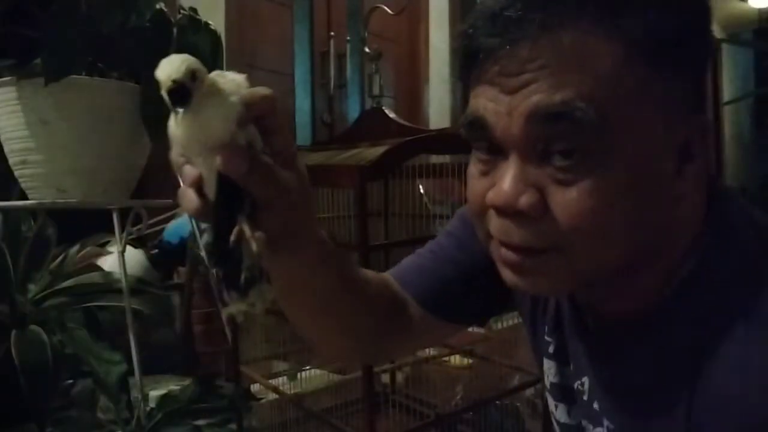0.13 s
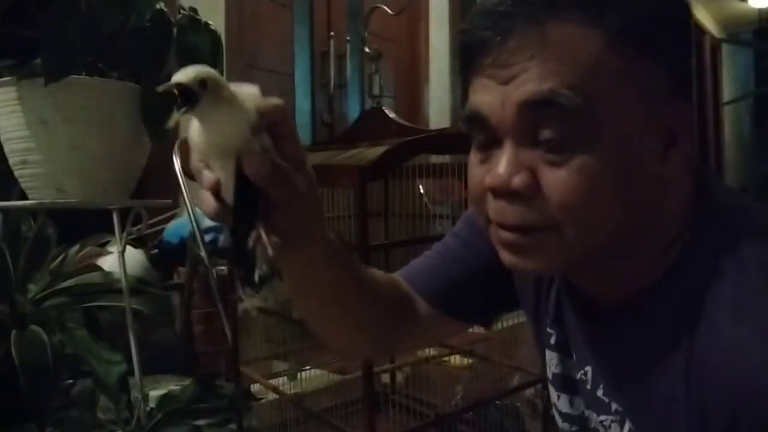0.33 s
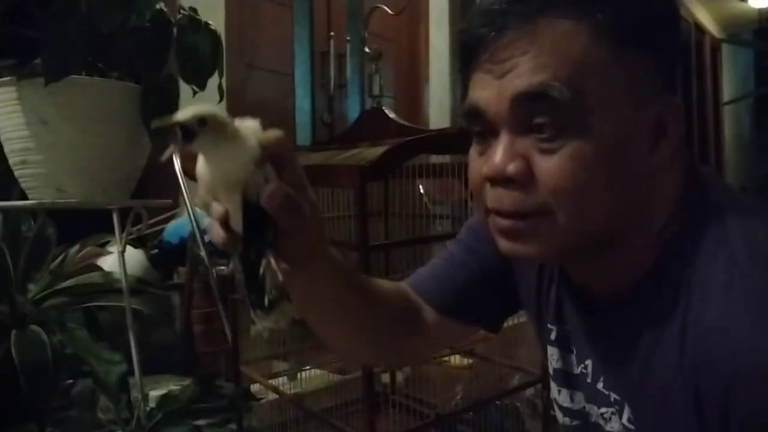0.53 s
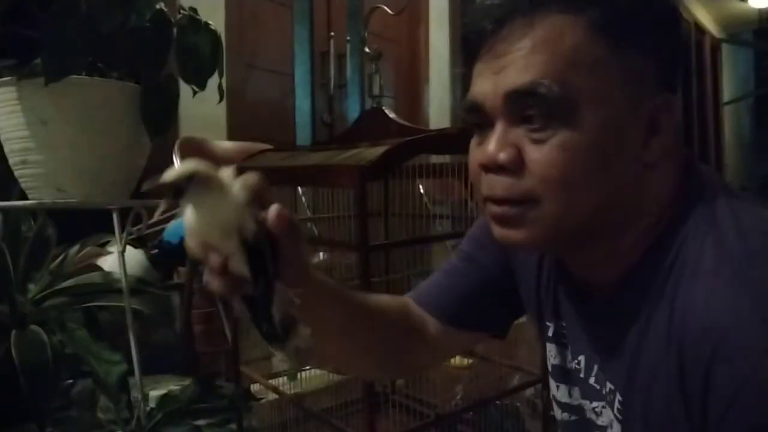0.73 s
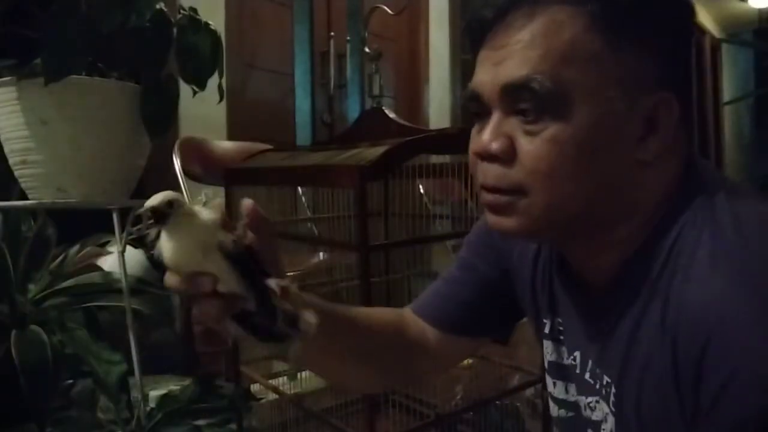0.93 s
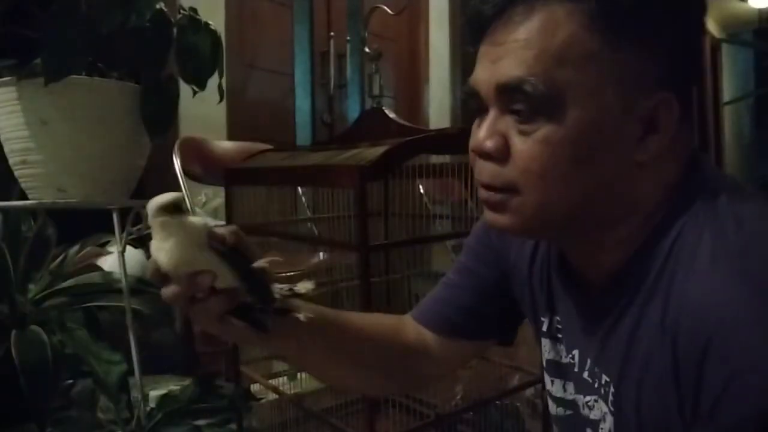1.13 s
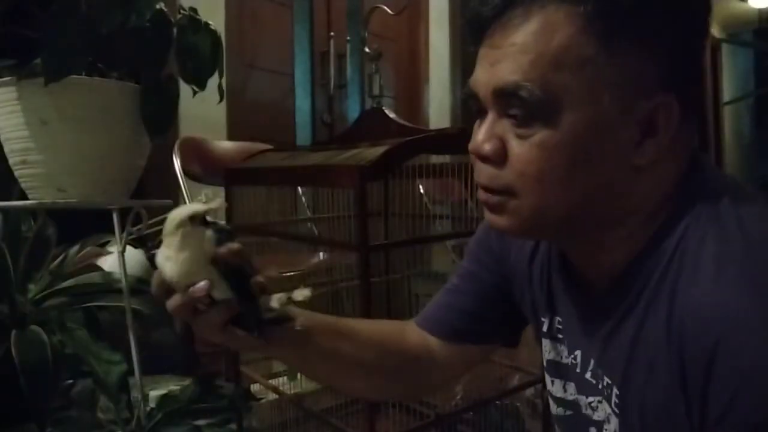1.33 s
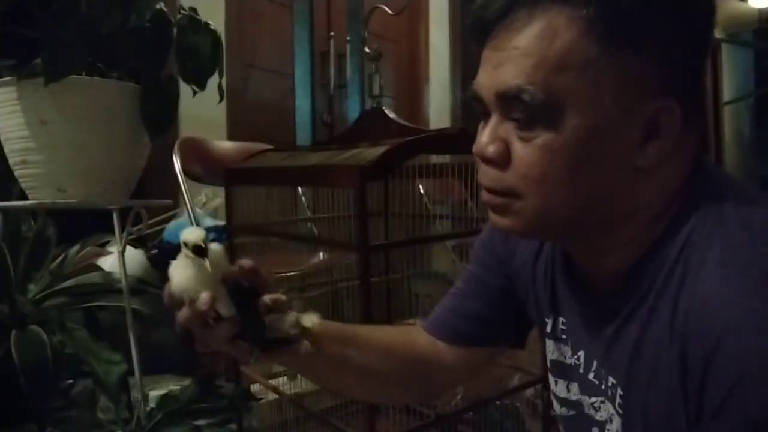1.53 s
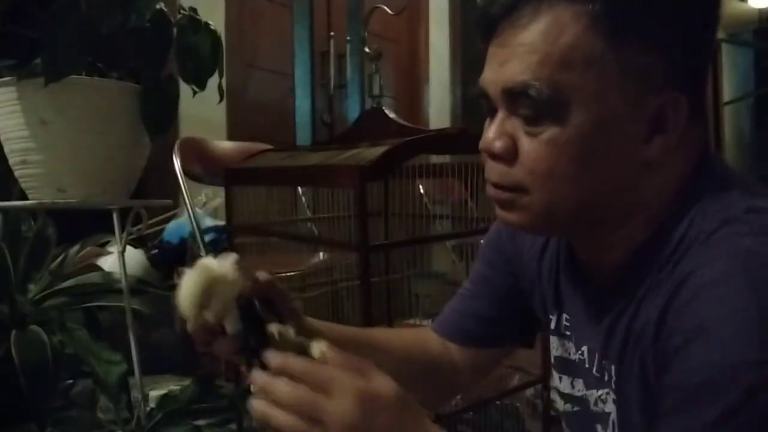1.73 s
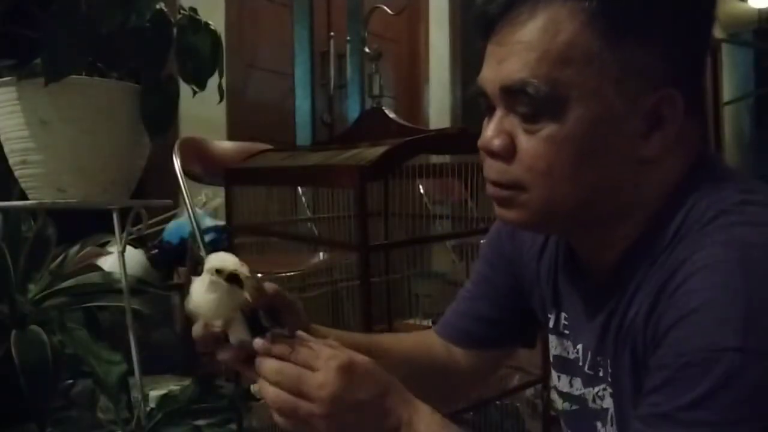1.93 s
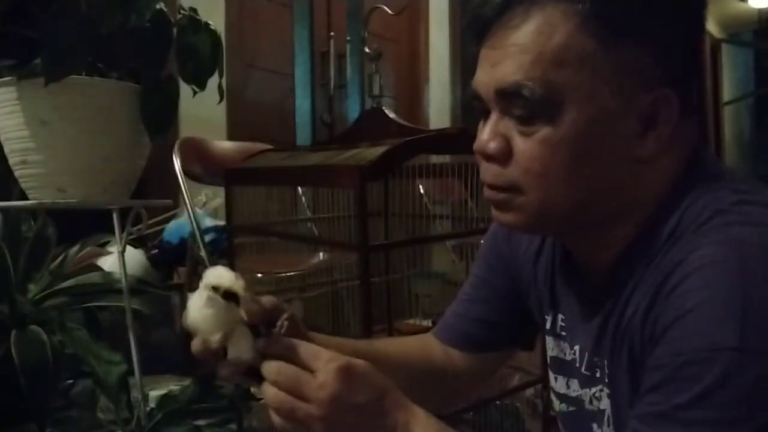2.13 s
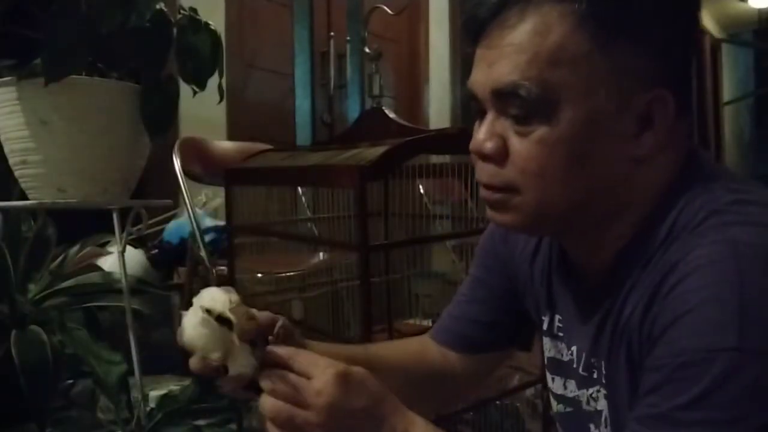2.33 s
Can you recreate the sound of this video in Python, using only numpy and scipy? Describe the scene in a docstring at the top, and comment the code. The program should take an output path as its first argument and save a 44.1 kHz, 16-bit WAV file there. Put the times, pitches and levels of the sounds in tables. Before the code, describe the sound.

A myna held in the hand squawks twice close to the microphone, shrill and raspy, then just starts a third call. Low rumble, hiss and soft handling noise lie underneath in a small hard room.

```python
"""Low rumble, hiss and a soft handling noise in a small hard room; then a myna, held in the hand
close to the microphone, squawks twice and starts a third call.
Each squawk is a shrill tone with strong overtones; the syrinx breaks into a chaotic rasp and,
in stretches of the first two calls, a slower second vibration."""
import sys
import numpy as np
from scipy import signal
from scipy.fft import rfft, irfft, next_fast_len
from scipy.io import wavfile
from scipy.ndimage import uniform_filter1d, minimum_filter1d, map_coordinates

SR = 44100
rng = np.random.default_rng(int(sys.argv[2]) if len(sys.argv) > 2 else 0)


def to_wav(s):
    """Save 16-bit WAV."""
    ch = np.atleast_2d(s).T  # columns
    pcm = np.round(np.clip(ch, -1, 1) * 32767)  # PCM
    wavfile.write(sys.argv[1], SR, pcm.astype(np.int16))


N = 104605


def amp(db):
    """Decibels to gain."""
    return 10 ** (np.asarray(db) / 20)


def unit(x):
    """Scale to rms 1."""
    return x / np.sqrt(np.mean(x ** 2) + 1e-20)


def along(points, hz):
    """(Hz, value) points on a log axis."""
    f, v = np.transpose(points)
    return np.interp(np.log(hz + 1), np.log(f + 1), v)


def clock():
    """The time of each sample."""
    return np.arange(N) / SR


def curves(rows):
    """One value per sample for each column after the time."""
    s, *cols = np.transpose(rows)
    return [np.interp(clock(), s, c) for c in cols]


def wobble(rate):
    """A smooth random curve, rate knots a second."""
    return map_coordinates(rng.standard_normal(int(N * rate / SR) + 4), [clock() * rate])


def gate(start, end, rise, fall):
    """Open from start to end, with ramps outside."""
    return np.interp(clock(), [start - rise, start, end, end + fall], [0, 1, 1, 0])


def filtered(x, response):
    """x times a complex response of frequency."""
    m = next_fast_len(N + SR // 2)
    return irfft(rfft(x, m) * response(np.fft.rfftfreq(m, 1 / SR)), m)[..., :N]


# Room tone at the microphone (frequency [Hz], relative density [dB])
ROOM_TONE = [(18, -20.5), (40, -15), (75, -11.5), (140, -15), (195, -14), (290, -15.5), (420, -19),
             (750, -20), (1500, -27.5), (3000, -34), (6000, -40.5), (9500, -35), (11500, -40), (12800, -52),
             (15500, -56.5)]
# How alike it is left and right (frequency [Hz], correlation [0-1])
ROOM_TONE_LIKENESS = [(60, 0.92), (250, 0.968), (600, 0.19), (1500, 0.033), (12000, 0.04)]
# Hum, dead centre (frequency [Hz], level [dB])
HUM_LINES = [(25.5, -41.5), (73, -60), (191, -56), (277, -56.5), (300, -57), (768, -61.5), (1530, -64.5)]


def room_tone():
    """Steady centred rumble and wide hiss, with a deep, slightly wavering hum."""
    def mid_and_side(hz):
        width = np.arccos(np.clip(along(ROOM_TONE_LIKENESS, hz), -1, 1)) / 2
        return amp(along(ROOM_TONE, hz)) * [np.cos(width), np.sin(width)]

    mid, side = filtered(rng.standard_normal((2, N)), mid_and_side)
    out = amp(-42.5) * unit(np.array([mid + side, mid - side]))
    for hz, db in HUM_LINES:
        waver = 0.029 * np.sqrt(hz) * wobble(6.43)
        out += amp(db) * np.sqrt(2) * np.sin(2 * np.pi * hz * clock() + waver)
    return out


# The hand, close to the microphone (time [s], level [dB], centre [Hz], width [Hz], t60 [s])
HAND_BUMPS = [(0.126, -43.5, 1580, 1800, 0.25), (2.091, -33.5, 1315, 169, 0.1),
              (2.109, -35.5, 695, 300, 0.076)]


def handling(rise_s=0.0014):
    """Short dull brushes and bumps as the bird is shifted in the hand."""
    out = np.zeros((2, N))
    for start, db, centre, width, t60 in HAND_BUMPS:
        age = np.maximum(clock() - start, 0)
        band = filtered(rng.standard_normal(N), lambda hz: 1 / (1 + (2 * (hz - centre) / width) ** 2))
        out += unit(band) * amp(db - 60 * age / t60) * (1 - np.exp(-age / rise_s))
    return out


# Decay of the small hard room (frequency [Hz], t60 [s])
ROOM_DECAY = [(300, 0.23), (3500, 0.46), (7000, 0.4), (11000, 0.32), (15000, 0.32)]


def room_echo(near, tail_rise_s=0.0055, early_decay_s=0.0081):
    """Early reflections from surfaces near the microphone, then a diffuse tail."""
    hz, times, spectra = signal.stft(rng.standard_normal((2, SR * 3 // 4)), SR, nperseg=256)
    decay = amp(-60 * times / along(ROOM_DECAY, hz)[:, None])
    tail = signal.istft(spectra * decay, SR, nperseg=256)[1]
    age = np.arange(tail.shape[1]) / SR
    tail *= 1 - np.exp(-age / tail_rise_s)
    spikes = rng.standard_normal(tail.shape) ** 5
    early = spikes * (age > 0.002) * np.exp(-age / early_decay_s)
    response = sum(amp(db) * part / np.linalg.norm(part, axis=1, keepdims=True)
                   for part, db in [(tail, -14.5), (early, -6.5)])
    return signal.fftconvolve(near, response, axes=1)[:, :N]


# Pitch of each call (time [s], pitch [Hz])
FIRST_PITCH = [(1.06, 3204), (1.09, 3318), (1.135, 3876), (1.18, 3990), (1.197, 3940), (1.203, 3670.0),
               (1.249, 3779), (1.285, 3686), (1.3, 3840.0), (1.312, 3510), (1.381, 3600), (1.395, 3397),
               (1.414, 3256), (1.46, 3315.0), (1.501, 3040), (1.524, 3369)]
SECOND_PITCH = [(1.706, 3241), (1.722, 3375.0), (1.784, 3200), (1.804, 3480), (1.861, 3686), (1.894, 3610),
                (1.902, 3506), (1.934, 3570), (1.948, 3718), (1.958, 3610), (1.968, 3454), (1.983, 3421),
                (1.994, 3566), (2.008, 3661), (2.023, 3389), (2.045, 3470), (2.054, 3550), (2.074, 3413),
                (2.096, 3179)]
THIRD_PITCH = [(2.347, 3239), (2.352, 3237), (2.36, 3142), (2.372, 3240)]
# Relative levels at the syrinx (time [s], fundamental [dB], second [dB], third [dB], rasp [dB])
FIRST_VOICE = [(1.062, -33.5, -42, -66, -52), (1.099, -36, -29.5, -55, -63),
               (1.139, -20.5, -26, -33.5, -60), (1.19, -13.5, -23, -27.5, -28), (1.207, -20, -16, -21, -26),
               (1.29, -15.5, -17.5, -18, -30.5), (1.375, -16.5, -17.5, -21, -26),
               (1.44, -21.5, -14, -22.5, -32), (1.473, -19, -17, -17, -29), (1.516, -17, -13, -38, -30),
               (1.535, -28.5, -64, -54, -27)]  # a clean rise, then ever harsher
SECOND_VOICE = [(1.706, -32.5, -35, -35, -33), (1.731, -33, -28, -46, -25.5), (1.765, -33, -56, -36, -23.5),
                (1.812, -21, -24, -42, -19.5), (1.863, -19.5, -15, -24, -15.5),
                (1.909, -15.5, -15, -17, -19.5), (1.979, -15.5, -15, -17, -22.5),
                (2.025, -14, -15.5, -17, -43), (2.071, -11.5, -15, -18, -31.5),
                (2.098, -21.5, -41, -50, -17.5)]  # a harsh start that clears into a warble
THIRD_VOICE = [(2.35, -25.5, -37, -55.5, -45), (2.362, -26, -26.5, -56.5, -43), (2.38, -20, -40, -50, -37)]
# Place of the beak at the microphone, per call (phase lead [factor], left over right [dB])
BEAK_PLACES = [(1.135, 0.1), (0.77, 0.3), (0.83, 3)]
# Lead of the left channel at a factor of 1 (frequency [Hz], phase [rad])
LEFT_LEAD = [(100, 4.5), (2000, 1.5), (3500, 1.19), (7000, 2.5), (9000, 5.5), (11000, 6), (15000, 7)]


def myna():
    """Three close calls, each from a slightly different place before the microphone."""
    calls = [(FIRST_PITCH, FIRST_VOICE), (SECOND_PITCH, SECOND_VOICE), (THIRD_PITCH, THIRD_VOICE)]
    sides = np.array([[0.5], [-0.5]])
    out = np.zeros((2, N))
    for (pitch, voice), (lead, pan_db) in zip(calls, BEAK_PLACES):
        placing = lambda hz: amp(sides * pan_db) * np.exp(1j * sides * lead * along(LEFT_LEAD, hz))
        out += filtered(squawk(pitch, voice), placing)
    return out


def squawk(pitch, voice):
    """One call of the syrinx: tone, rasp and screech; pitch scatters with strain and roughness."""
    hz, = curves(pitch)
    first_db, second_db, third_db, rasp_db = curves(voice)
    roughness = amp(rasp_db) / (amp(rasp_db) + amp(first_db))
    strain = amp((third_db - third_db.max()) / 2)
    jitter = 0.005026 * (1 + strain) * wobble(420) + 0.0188 * roughness ** 3 * wobble(1100)
    phase = 2 * np.pi * np.cumsum(hz * (1 + jitter)) / SR
    tone = shrill_tone(phase, [first_db, second_db, third_db, third_db - 25.5], strain)
    call = amp(-2) * np.sqrt(2) * tone + amp(rasp_db - 11) * rasp(phase) + screech()
    beak_open = gate(voice[0][0], voice[-1][0], rise=0.0059, fall=0.0053)
    return call * beak_open


# What the beak passes of the tone (frequency [Hz], gain [dB])
BEAK_RESPONSE = [(1500, -17.5), (2400, 3.5), (3000, 0), (11300, 0), (12500, -23), (15500, -8)]


def shrill_tone(phase, harmonics_db, strain, shimmer_db=0.36):
    """Harmonics of the syrinx, heard through the beak; their level trembles under strain."""
    slower = second_vibration(phase)
    tone = sum(amp(db - shimmer_db * wobble(180)) * np.sin(k * (phase + slower))
               for k, db in enumerate(harmonics_db, 1))
    tone = filtered(tone * (1 + slower), lambda hz: amp(along(BEAK_RESPONSE, hz)))
    tremor = amp(strain * wobble(540))
    dropout = gate(1.729, 1.772, rise=0.0026, fall=0.0026)  # early in the second call
    return tone * tremor * (1 - dropout)


# What the throat passes of the rasp (frequency [Hz], gain [dB])
THROAT_RESPONSE = [(300, -19), (1200, -21.5), (1900, 4), (3500, -3), (6000, 2), (9500, 7), (11000, -10),
                   (12500, -47), (15500, -15)]


def rasp(phase, harmonics_db=(-8, 0, 1)):
    """Chaotic vibration: ragged side tones round three harmonics, shaped by the throat."""
    bands = sum(amp(db) * (skirt() * np.cos(k * phase) + skirt() * np.sin(k * phase))
                for k, db in enumerate(harmonics_db, 1))
    pulsing = 1 + 0.61 * np.cos(phase)
    chaos = ragged(unit(bands)) * pulsing
    flutter = amp(-wobble(400))
    return filtered(chaos * flutter, lambda hz: amp(along(THROAT_RESPONSE, hz)))


def skirt(spread_hz=1404, gap_hz=520, gap_db=-12):
    """Noise that spreads a harmonic into gritty side tones, weaker close to the harmonic."""
    gap = lambda hz: amp(gap_db / (1 + (hz / gap_hz) ** 6))
    return filtered(rng.standard_normal(N), lambda hz: gap(hz) / np.sqrt(1 + (hz / spread_hz) ** 6))


def ragged(x, depth_db=6.5):
    """Give a sound short-lived peaks and gaps across its spectrum."""
    spectra = signal.stft(x, nperseg=256)[2]
    patches = uniform_filter1d(rng.standard_normal(spectra.shape), size=2, axis=0)
    patches = unit(uniform_filter1d(patches, size=8, axis=1))
    return signal.istft(spectra * amp(depth_db * np.clip(patches, -2, 2)), nperseg=256)[1][:N]


# Where the voice splits (start [s], end [s], share of the pitch [0-1], depth [0-1], drift [rad])
VOICE_SPLITS = [(1.193, 1.285, .5, 0.13, 0.63), (1.31, 1.39, 0.49, 0.13, 0.39),
                (1.419, 1.479, 0.24, 0.3, 0.42), (1.846, 1.924, 0.35, 0.07, 0.57),
                (1.945, 2.004, 0.53, 0.08, 1.1)]


def second_vibration(phase, fade_s=0.014):
    """A slower vibration of the syrinx that swings the tone's phase and level, adding sidebands."""
    return sum(depth * gate(start, end, fade_s, fade_s) * np.cos(share * phase + drift * wobble(200))
               for start, end, share, depth, drift in VOICE_SPLITS)


# The harshest moments (start [s], end [s], rise [s], fall [s], level [dB])
SCREECH_BURSTS = [(1.414, 1.478, 0.057, 0.066, -28), (1.727, 1.755, .01, 0.019, -30.5),
                  (1.795, 1.851, 0.028, 0.025, -22.5)]
# Their colour at close range (frequency [Hz], relative level [dB])
SCREECH_SPECTRUM = [(300, -32), (1200, -19), (1900, -8), (3000, -4), (4200, 4), (6500, -14), (9500, 2),
                    (11500, -6.5), (13200, -8), (15500, -29)]


def screech():
    """The syrinx in full chaos: a wide, fluttering screech."""
    level = sum(amp(db) * gate(*timing) for *timing, db in SCREECH_BURSTS)
    chaos = filtered(ragged(rng.standard_normal(N)), lambda hz: amp(along(SCREECH_SPECTRUM, hz)))
    flutter = amp(-wobble(400))
    return level * unit(chaos) * flutter


def scene():
    """Bird and hand close to the microphone, the room behind them."""
    near = myna() + handling()
    return near + room_echo(near) + room_tone()


def record(dry, ceiling=0.91, top_hz=15750):
    """A fast limiter holds the highest peaks; nothing is kept above the band limit."""
    needed_gain = np.minimum(1, ceiling / (np.abs(dry).max(axis=0) + 1e-9))
    gain = uniform_filter1d(minimum_filter1d(needed_gain, size=301), size=301)
    return filtered(dry * gain, lambda hz: hz < top_hz)


dry = scene()
out = record(dry)
to_wav(out)
```